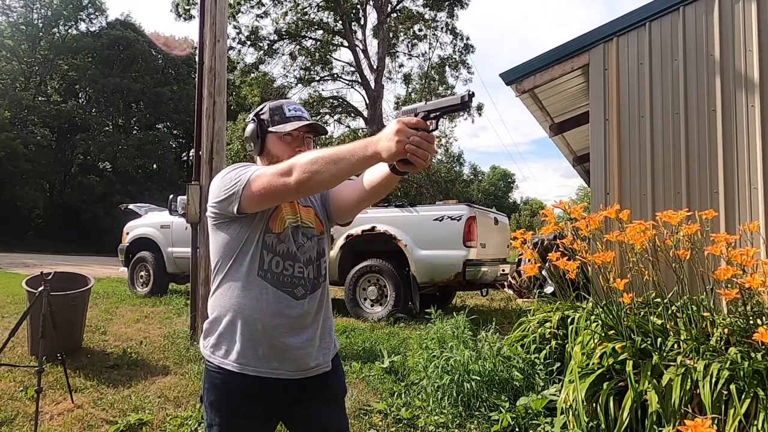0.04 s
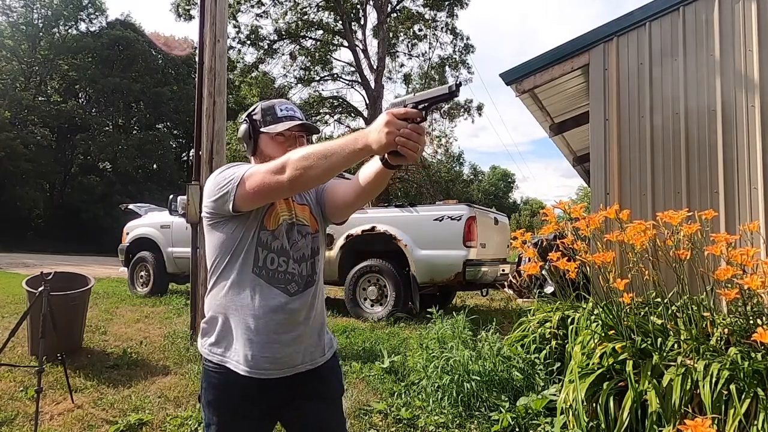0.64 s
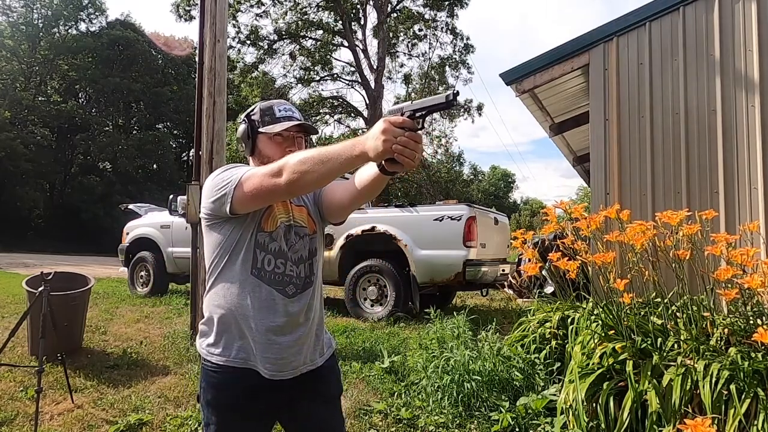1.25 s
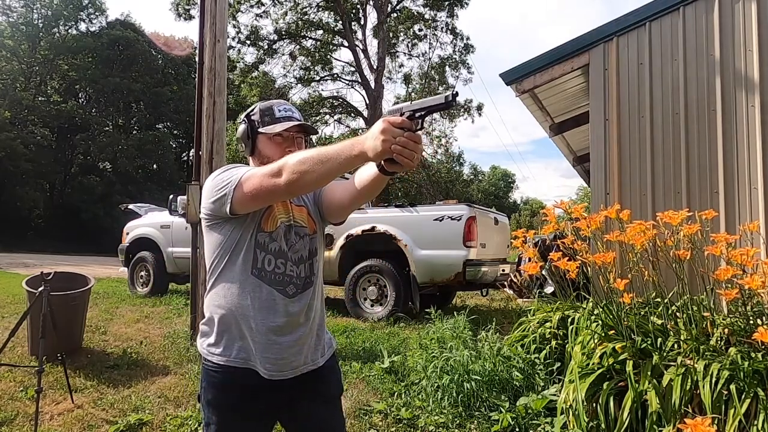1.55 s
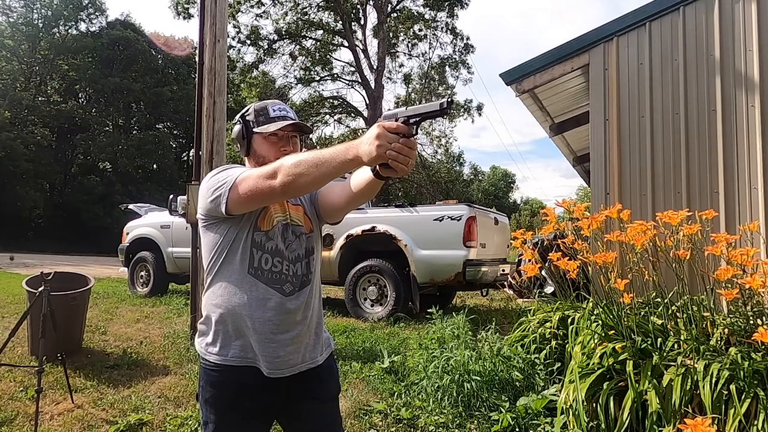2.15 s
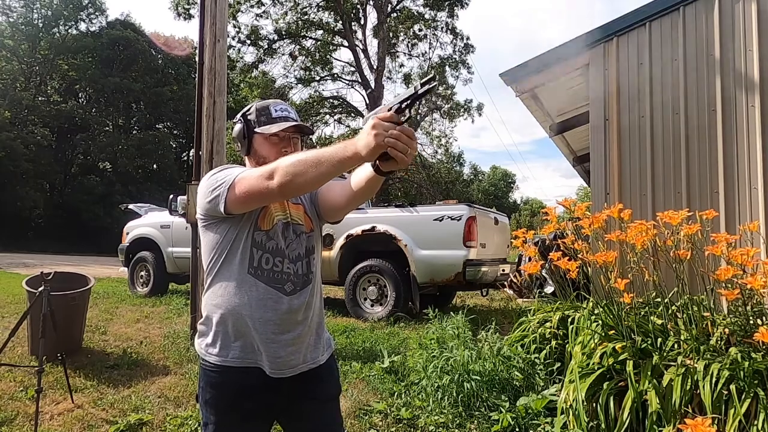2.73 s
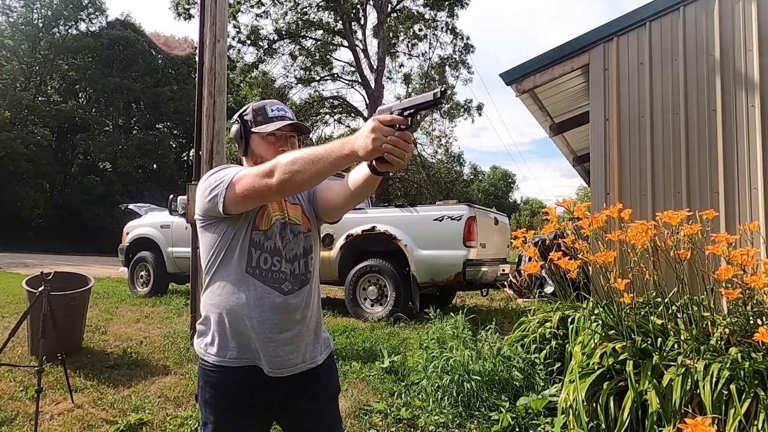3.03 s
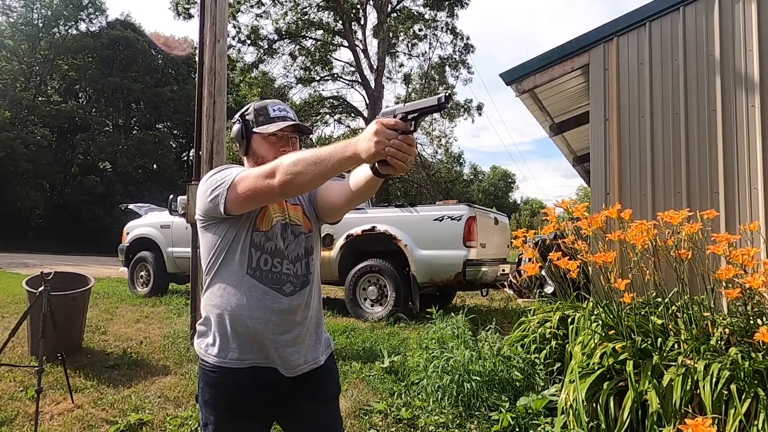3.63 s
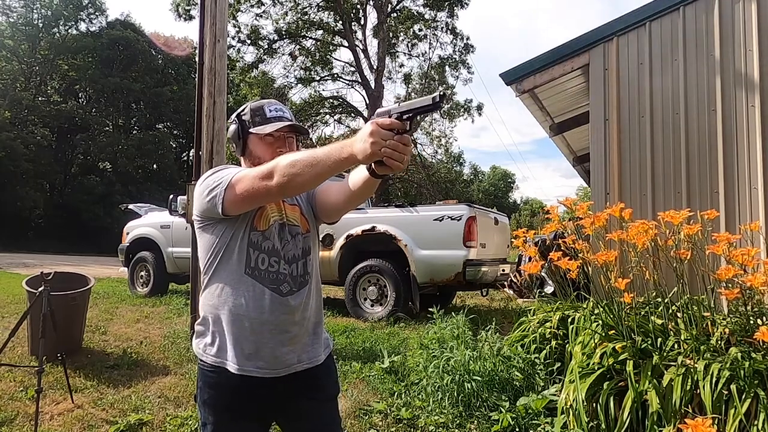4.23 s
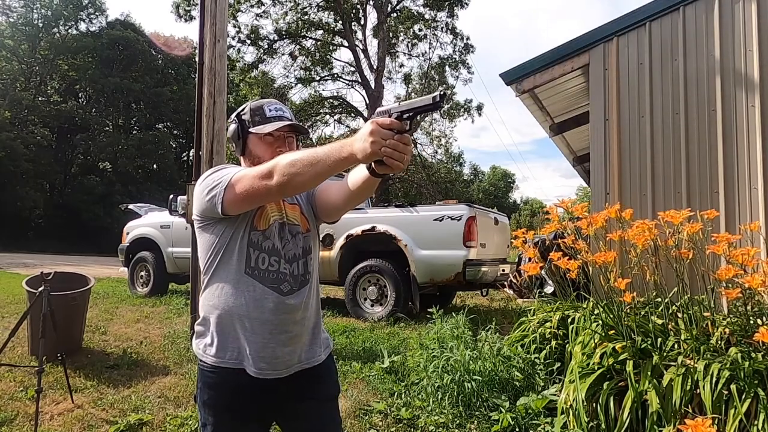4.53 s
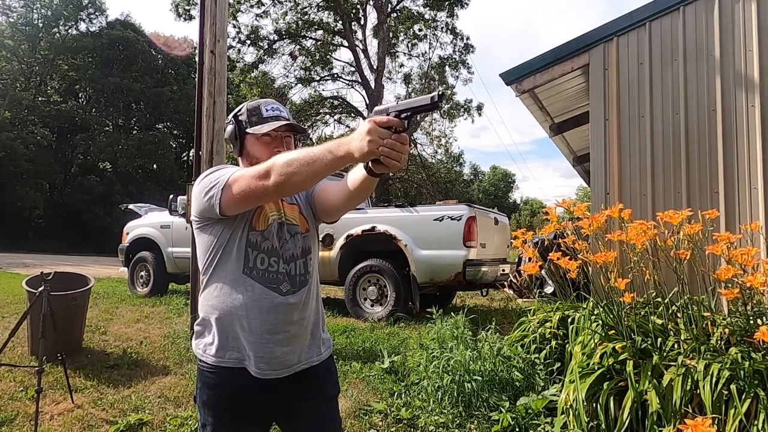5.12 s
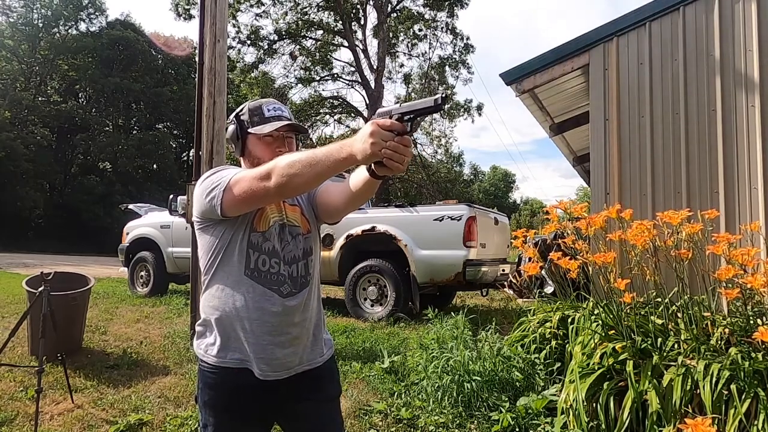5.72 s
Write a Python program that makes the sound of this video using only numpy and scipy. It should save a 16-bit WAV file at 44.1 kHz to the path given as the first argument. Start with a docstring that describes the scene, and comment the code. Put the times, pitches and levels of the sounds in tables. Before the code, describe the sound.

A pistol is fired five times at a steady pace in an open yard, roughly one shot per second. Each loud, sharp crack bounces off a nearby barn and fades into trees and hillside, with a small smack of the bullet landing just after. Spent cases ping faintly and drop with dull ticks. The close microphone overloads slightly on the shots and picks up light wind rumble and a faint insect hiss.

```python
"""Five pistol shots in a yard beside a metal barn, each a steep pressure front from the muzzle.
Ground and walls reflect it; trees and a wooded hillside scatter it into a long wash as the bullet
smacks the backstop. Spent cases ping and land, wind buffets the microphone and insects hiss far off.
A phone a few metres away overloads on each crack and holds its gain down from the first one on."""
import sys
import numpy as np
from scipy import signal
from scipy.fft import rfft, irfft
from scipy.io import wavfile
from scipy.ndimage import uniform_filter1d

SR = 44100
rng = np.random.default_rng(int(sys.argv[2]) if len(sys.argv) > 2 else 0)


def log_audio(samples):
    """Write samples as a 16-bit WAV file to the path given in sys.argv[1]."""
    # one column per channel
    frames = np.atleast_2d(samples).T
    # limit to full scale, then quantise
    limited = np.clip(frames, -1, 1)
    pcm = np.round(limited * 32767).astype(np.int16)
    wavfile.write(sys.argv[1], SR, pcm)


N = 254456
LEAD = 4096  # samples ahead of a pulse
AGE = (np.arange(16 * LEAD) - LEAD) / SR  # seconds since the pulse

# each shot and the gains of its parts: start_s, blast_db, rush_db, far_echo_db, smack_db, spray_db
SHOTS = [(0.498, 2.5, -14, -1, -10, -30.5), (1.667, 0, -19.5, -1, -6, -37.5),
         (2.7949, 1.5, -19.5, -2, -10, -28), (3.885, 0.5, -20, -2.5, -9.5, -29.5),
         (4.8836, 3, -24, -2, -9, -26.5)]


def amp(db):
    """Decibels as an amplitude ratio."""
    return 10 ** (np.asarray(db) / 20)


def curve(points, hz):
    """Interpolation of (frequency_hz, value) rows on a logarithmic frequency axis."""
    known_hz, value = np.transpose(points)
    return np.interp(np.log(np.maximum(hz, 1)), np.log(known_hz), value)


def freqs(x):
    """Fourier frequencies of x in Hz."""
    return np.fft.rfftfreq(x.shape[-1], 1 / SR)


def colour(x, spectrum):
    """Zero-phase filtering by (frequency_hz, gain_db) rows."""
    return irfft(rfft(x) * amp(curve(spectrum, freqs(x))), x.shape[-1])


def noise(spectrum, size, apart):
    """Partly coherent noise of rms 1 at two microphone ports; apart weights their difference."""
    mid, side = rng.standard_normal((2, size))
    x = colour(np.array([mid + apart * side, mid - apart * side]), spectrum)
    return x / x.std()


def wander(t, step_s):
    """Random fluctuation: Gaussian values joined by straight lines."""
    return np.interp(t, np.arange(1000) * step_s, rng.standard_normal(1000))


def add(out, x, start_s):
    """Superposition of x on out from start_s on."""
    i = int(round(start_s * SR))
    a, b = max(i, 0), min(i + x.shape[-1], out.shape[-1])
    out[..., a:b] += x[..., a - i:b - i]


def pulse(spectrum):
    """A pressure front of peak 1; minimum phase packs its energy at the start."""
    cepstrum = irfft(np.log(amp(curve(spectrum, freqs(AGE)))))
    cepstrum[1:] *= 2
    cepstrum[len(AGE) // 2:] = 0
    front = np.roll(irfft(np.exp(rfft(cepstrum))), LEAD)
    return front / abs(front).max()


def scatter(spectrum, decay, start_s, rise_s, hold_s, alike, apart):
    """Diffuse scattering, one wash per shot; the scatterers stand still, so washes are partly alike."""
    common = noise(spectrum, len(AGE), apart)
    own = np.array([noise(spectrum, len(AGE), apart) for _ in SHOTS])
    washes = np.sqrt(alike) * common + np.sqrt(1 - alike) * own
    hz, frame_s, frames = signal.stft(washes, SR, nperseg=512)
    fading_s = np.maximum(frame_s + AGE[0] - start_s - hold_s, 0)
    fade = amp(-60 * fading_s / curve(decay, hz)[:, None])  # air and leaves absorb the treble first
    washes = signal.istft(frames * fade, SR)[1][..., :len(AGE)]
    return washes * np.clip((AGE - start_s) / rise_s, 0, 1)


def wind(buffet_db=4):
    """Turbulent pressure at the microphone ports rumbles in uneven gusts."""
    rumble = [(12, -17.5), (22, -1.5), (44, -1), (72, -6), (110, -14), (220, -35), (325, -58.5),
              (1100, -120)]  # turbulence spectrum: frequency_hz, density_db
    gusts = [(0.0, -64), (0.04, -50), (0.48, -40), (0.92, -54.5), (1.28, -51), (1.52, -36), (2.12, -58.5),
             (2.24, -41), (2.76, -53), (2.84, -33), (3.17, -58.5), (3.33, -44), (3.41, -62.5),
             (3.65, -41.5), (3.89, -49), (3.93, -43), (4.45, -57), (4.93, -34), (5.13, -50.5), (5.77, -77)]  # wind strength: time_s, level_db
    t = np.arange(N) / SR
    gust_db = np.interp(t, *np.transpose(gusts)) + buffet_db * wander(t, step_s=.04)
    return amp(gust_db) * noise(rumble, N, apart=.04)


def insects():
    """Distant insects and leaves sum incoherently to a steady hiss."""
    hiss = [(180, -61.5), (300, -8.5), (763, -16), (884, -14.5), (1350, -11), (4120, -4), (6510, -11),
            (10300, -25), (12100, -21.5), (15000, -50)]  # background spectrum: frequency_hz, density_db
    return amp(-68.5) * noise(hiss, N, apart=.18)


def swell(rise_s, fade_s):
    """A round-shouldered envelope that peaks at the shot."""
    return np.exp(-abs(AGE / np.where(AGE < 0, rise_s, fade_s)) ** 1.5)


def rush():
    """Amplitude-shaped noise: a dull rush swells into the crack."""
    # frequency_hz, density_db
    spectrum = [(50, 3.5), (160, -3), (450, -.5), (1300, -8.5), (2000, -24), (5000, -25.5),
                (10000, -34.5), (15000, -66)]
    return swell(rise_s=.015, fade_s=.0045) * noise(spectrum, len(AGE), apart=.2)


def crack(snap_lead_s=.00035):
    """A shock-wave crack with gas rasp and reflections; a brief ringing tone swells into it and fades."""
    shock = [(300, -11), (2000, -10), (3200, -9.5), (4500, 9), (6500, -6), (9000, -8.5), (15000, -42)]  # bullet's shock wave: frequency_hz, level_db
    blast = [(40, -23), (150, 9), (450, -3.5), (800, 4.5), (1300, 8.5), (2000, -11), (3000, -5),
             (4600, -3.5), (7000, -26.5), (11000, -24), (16000, -43)]  # muzzle blast: frequency_hz, level_db
    rasp = [(1000, 2.5), (2200, -4.5), (3000, -1), (4500, 3), (6500, -9.5), (9300, -7.5), (12000, -27.5),
            (16000, -31)]  # muzzle gas: frequency_hz, density_db
    partials = [(143, -20.5, .008, .014), (330, -22.5, .008, .016), (517, -25, .007, .016),
                (708, -22, .007, .016), (899, -16, .013, .006), (1270, -26, .006, .015),
                (1425, -31, .006, .011), (3040, -39, .008, .009), (7910, -46, .016, .002)]  # brief ringing tone: pitch_hz, level_db, rise_s, fade_s
    reflections = [(.0061, -12.5, 1800), (0.0133, -26.5, 5000), (0.018, -22, 4500)]  # ground and nearby surfaces: delay_s, gain_db, cutoff_hz
    snap = amp(-4) * np.roll(pulse(shock), -int(snap_lead_s * SR))
    front = amp(6.5) * pulse(blast)
    gas = amp(-8.5) * swell(rise_s=.00005, fade_s=.0019) * noise(rasp, len(AGE), apart=.073)
    ring = sum(amp(db) * swell(rise_s, fade_s) * np.cos(2 * np.pi * hz * AGE)
               for hz, db, rise_s, fade_s in partials)
    return snap + front + gas + ring + sum(slap(front, *row) for row in reflections)


def yard_echo():
    """Early scattering in the yard follows the blast at once and dies quickly."""
    spectrum = [(40, 1.5), (130, 5.5), (240, 5), (440, -12), (700, -8), (1350, -7.5), (1800, -13),
                (3000, -12.5), (5500, -23.5), (10900, -28), (14000, -52)]  # scattered sound: frequency_hz, density_db
    decay = [(150, 0.2), (1000, 0.2), (8000, 0.16)]  # reverberation time: frequency_hz, t60_s
    return amp(-20) * scatter(spectrum, decay, start_s=.0004, rise_s=.00053, hold_s=.00033,
                              alike=.95, apart=.26)


def slap(front, delay_s, gain_db, cutoff_hz):
    """Specular reflection: a flat surface returns the front later and duller."""
    dull = signal.sosfilt(signal.butter(2, cutoff_hz, fs=SR, output="sos"), front)
    return amp(gain_db) * np.roll(dull, int(delay_s * SR))


def cases(ping_delay_s=.031, ping_hz=2750, ping_t60_s=.07, tick_fade_s=.0049):
    """Each ejected brass case rings in damped free vibration, then lands with a dull tick."""
    landings = [(1.4256, -43), (2.5154, -47.5), (3.6017, -51), (4.759, -52), (5.7362, -49.5)]  # ground impacts: start_s, level_db
    tick = [(500, 9), (3000, -6), (7000, -15), (14000, -24)]  # frequency_hz, density_db
    out, t = np.zeros((2, N)), np.arange(LEAD) / SR
    ping = amp(-34 - 60 * t / ping_t60_s) * np.sin(2 * np.pi * ping_hz * t)
    for shot_s, *_ in SHOTS:
        add(out, ping, shot_s + ping_delay_s)
    for start_s, level_db in landings:
        add(out, amp(level_db) * np.exp(-t / tick_fade_s) * noise(tick, LEAD, apart=.18), start_s)
    return out


def tree_echo(clump_db=1):
    """Scattering from nearby trees; echoes bunch by trunk and branch, so the level flutters."""
    spectrum = [(24, -84), (40, -21), (103, -9.5), (182, -1.5), (251, -4.5), (466, 0.5), (866, -4),
                (1060, -4), (2640, -9), (10900, -28), (13300, -35.5), (15000, -65.5)]  # scattered sound: frequency_hz, density_db
    decay = [(150, 0.37), (1000, 0.84), (4000, 1), (9000, .6)]  # reverberation time: frequency_hz, t60_s
    washes = scatter(spectrum, decay, start_s=.043, rise_s=.045, hold_s=.18, alike=.6, apart=.14)
    return washes * amp(-29 + clump_db * wander(AGE, step_s=.0041))


def wall_echo():
    """Walls, vehicles and trunks return discrete echoes, each delayed by its path length."""
    spectrum = [(80, -19), (400, -2), (900, 1), (1500, 1.5), (2700, -7), (4200, -15), (8000, -28),
                (15000, -43)]  # reflected pulse: frequency_hz, level_db
    paths = [(0.0779, -11), (0.081, -29), (0.0935, -21.5), (0.103, -18), (.1182, -16.5), (0.218, -16)]  # echo arrivals: delay_s, gain_db
    bounce = pulse(spectrum)
    return sum(amp(db) * np.roll(bounce, int(delay_s * SR)) for delay_s, db in paths)


def barn_echo():
    """Reflections from the barn and parked trucks merge into a short, hollow bounce."""
    spectrum = [(60, -11), (200, 1), (480, 4.5), (800, -7), (1400, -4), (2600, -33), (5000, -24),
                (14000, -66)]  # reflected sound: frequency_hz, density_db
    decay = [(200, .2), (4000, .15)]  # reverberation time: frequency_hz, t60_s
    return amp(-28) * scatter(spectrum, decay, start_s=.088, rise_s=.012, hold_s=.016,
                              alike=.8, apart=.14)


def hill_echo(clump_db=1.2):
    """Scattering over long paths: the wooded hillside returns a late, lingering wash."""
    spectrum = [(50, -28), (150, -16.5), (250, -16.5), (400, -10), (550, -4), (950, 4.5), (1400, 1),
                (2200, -7), (5000, -12), (8000, -27), (11000, -31), (15000, -56.5)]  # scattered sound: frequency_hz, density_db
    decay = [(80, 1.6), (220, 1.3), (500, 1.99), (1100, 1.596), (2300, 1.34), (4500, 0.92), (9000, 0.78),
             (14000, 0.35)]  # reverberation time: frequency_hz, t60_s
    washes = scatter(spectrum, decay, start_s=.18, rise_s=.13, hold_s=.14, alike=.38, apart=.21)
    return washes * amp(-27.5 + clump_db * wander(AGE, step_s=.008))


def bullet_impact():
    """The backstop radiates a pulse when struck, and flying earth and leaves add a burst of noise."""
    smack = [(100, -22), (600, -4.5), (1100, 12.5), (1800, 2), (2700, -5.5), (4200, -6.5), (6000, -28),
             (15000, -45)]  # impact pulse: frequency_hz, level_db
    debris = [(100, -16), (400, -2.5), (1200, 2), (2200, -7.5), (4000, -11.5), (8000, -29), (15000, -60)]  # earth and leaves: frequency_hz, density_db
    decay = [(500, 0.29), (6000, .2)]  # their decay: frequency_hz, t60_s
    sprays = amp(1.5) * scatter(debris, decay, start_s=0, rise_s=.008, hold_s=.036, alike=0, apart=.2)
    return pulse(smack), sprays


def pistol(impact_delay_s=.2335):
    """Shots and echoes superpose; the impact lags by the bullet's flight plus the sound's return."""
    out = np.zeros((2, N))
    report = crack() + wall_echo()  # identical rounds give identical waveforms
    yard = yard_echo()
    far_echo = barn_echo() + tree_echo() + hill_echo()
    smack, sprays = bullet_impact()
    for k, (start_s, blast_db, rush_db, far_echo_db, smack_db, spray_db) in enumerate(SHOTS):
        shot = amp(rush_db) * rush() + amp(blast_db) * (report + yard[k]) + amp(far_echo_db) * far_echo[k]
        impact = amp(smack_db) * smack + amp(spray_db) * sprays[k]
        add(out, shot, start_s + AGE[0])
        add(out, impact, start_s + impact_delay_s + AGE[0])
    return out


def gain_control(x, boost_db, ramp_s):
    """Automatic gain control: a boost ramps away just ahead of the first overload and stays off."""
    overloaded = np.maximum.accumulate(abs(x).max(axis=0) >= 1)
    size = int(ramp_s * SR)
    down = uniform_filter1d(overloaded.astype(float), size, origin=-((size - 1) // 2))
    return x * amp(boost_db * (1 - down))


def scene():
    """Directivity: the left port faces the yard and hears all sources louder and brighter."""
    imbalance = [(60, 2.5), (150, 1.5), (400, 3), (1200, 5), (2300, 7.5), (4500, 5.5), (14000, 2.5)]  # left minus right: frequency_hz, difference_db
    left, right = pistol() + cases() + wind() + insects()
    lean = amp(curve(imbalance, freqs(left)) / 2)
    return np.array([irfft(rfft(left) * lean, N), irfft(rfft(right) / lean, N)])


def record(dry, dropout_start_s=3.2535, dropout_end_s=3.2735, cutoff_hz=16000):
    """Saturation rounds the peaks after gain control; the sound drops out once and the top is cut."""
    treble_loss = [(7000, -1), (11000, -4), (15000, -3)]  # frequency_hz, gain_db
    t = np.arange(N) / SR
    dropout = np.where((t > dropout_start_s) & (t < dropout_end_s), amp(-40), 1)
    driven = gain_control(dry, boost_db=12.5, ramp_s=.03)
    saturated = driven / (1 + driven ** 4) ** (1 / 4)
    lowpass = signal.ellip(8, .2, 70, cutoff_hz, fs=SR, output="sos")
    return signal.sosfilt(lowpass, colour(saturated * dropout, treble_loss))


dry = scene()
out = record(dry)
log_audio(out)
```